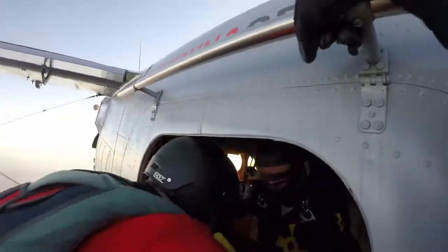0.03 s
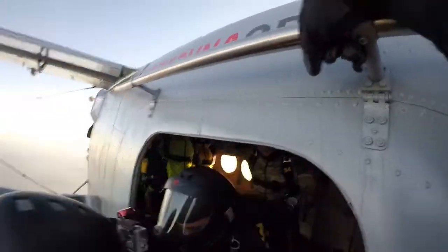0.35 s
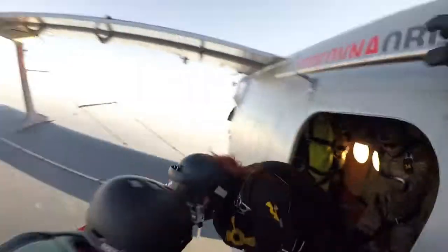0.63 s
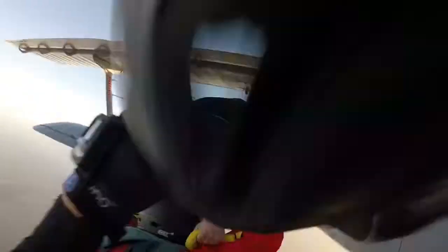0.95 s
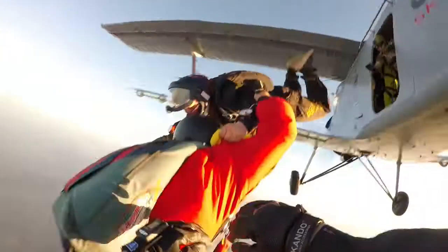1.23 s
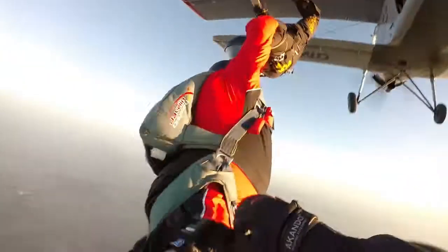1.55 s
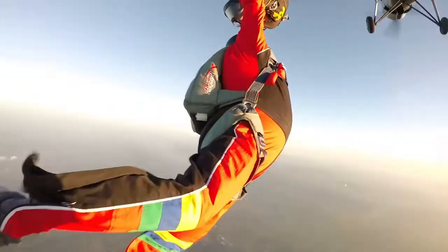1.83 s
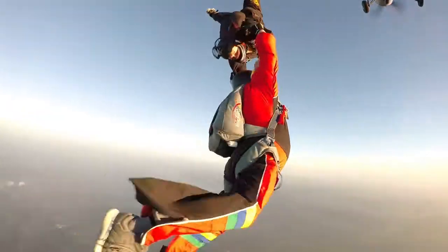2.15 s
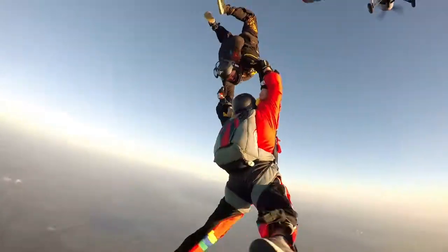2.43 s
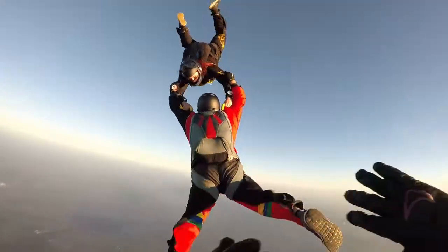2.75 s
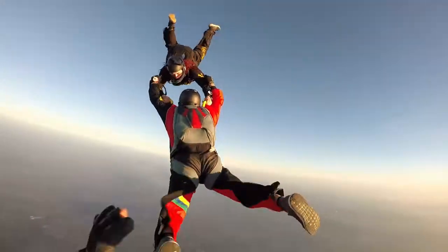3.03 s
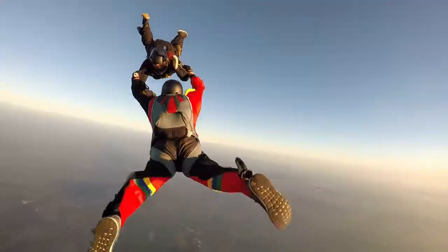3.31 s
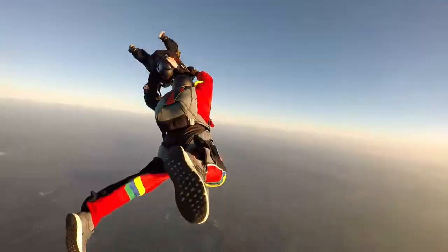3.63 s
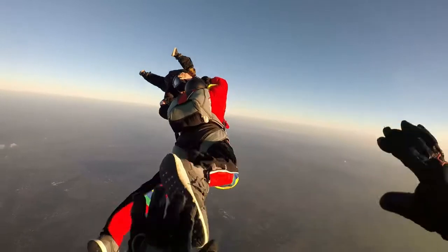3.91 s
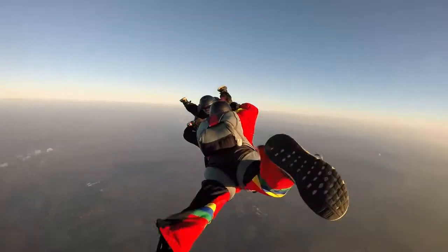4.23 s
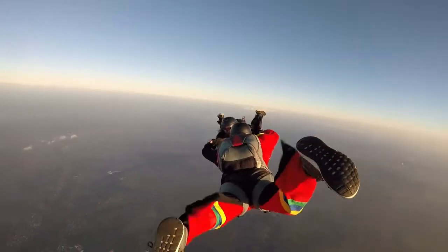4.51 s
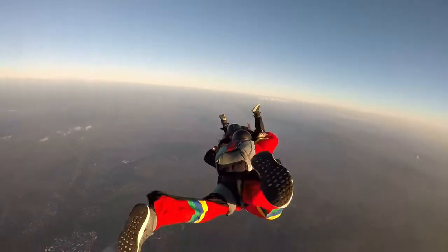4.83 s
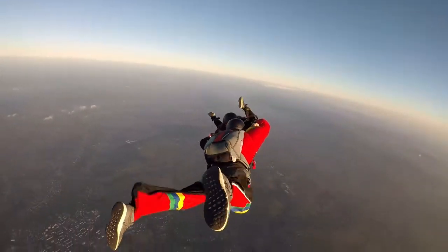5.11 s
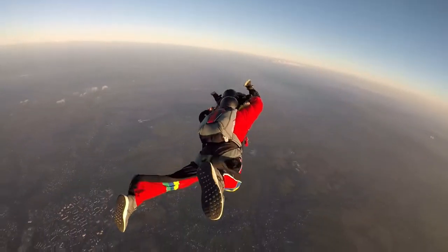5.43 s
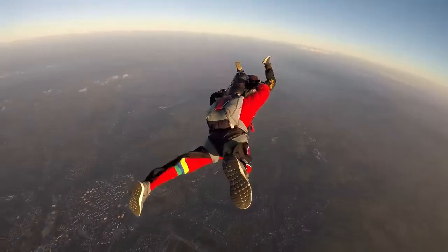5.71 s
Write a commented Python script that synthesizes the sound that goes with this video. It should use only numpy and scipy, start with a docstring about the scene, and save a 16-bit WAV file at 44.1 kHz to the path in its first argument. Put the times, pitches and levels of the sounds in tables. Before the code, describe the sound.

Strong wind buffets the microphone as a skydiver leaves an aircraft, a gusty hiss giving way to a growing free-fall roar.

```python
"""Skydiver's exit and free fall

A helmet camera hears the bright slipstream at an aircraft's door break into gusts as the skydiver
lets go; then the turbulent roar of free fall builds with speed. All along, eddies pound the
microphone port and drive a hollow at the helmet into throbbing resonance."""
import sys
import numpy as np
from scipy import signal
from scipy.fft import rfft, irfft
from scipy.io import wavfile
from scipy.ndimage import uniform_filter1d

SR = 44100
rng = np.random.default_rng(int(sys.argv[2]) if len(sys.argv) > 2 else 0)


def generate_wav(sig):
    """Save sig (samples, or channels by samples) to the path in sys.argv[1] as 16-bit PCM at SR."""
    pcm = np.round(np.clip(np.atleast_2d(sig).T, -1, 1) * 32767).astype(np.int16)
    wavfile.write(sys.argv[1], SR, pcm)


N = 254456
TIME = np.arange(N) / SR
HZ = np.maximum(np.fft.rfftfreq(N, 1 / SR), 1)

# Big eddies bursting on the port: (time [s], level [dB], length [s])
EDDY_BURSTS = [(1.49, -32.5, 0.021), (1.845, -30.5, 0.021), (1.88, -33, 0.059), (1.98, -32.5, 0.032),
               (2.46, -31.5, 0.076), (2.53, -39, 0.044), (3.32, -26.5, 0.044), (5.0, -34, 0.057),
               (5.3, -47, 0.039), (5.46, -32.5, 0.1)]
# Stretches of fluttering, moaning air, and one short low thump of a bursting eddy:
# (time [s], flutter level [dB], moan level [dB], length [s])
FLUTTER_AND_MOAN = [(.35, -40.5, -52, 1), (1.57, -36.5, -61, 0.41), (1.872, -29, -54, 0.062),
                    (2.285, -46, -41.5, 0.43), (3.95, -39, -49, 0.64), (4.9, -39.5, -41, 0.73),
                    (5.45, -31, -34, 0.33)]


def buffet():
    """Turbulent pressure: large eddies shove the diaphragm, easing as the body turns upright."""
    # Eddy strength: (time [s], relative level [dB])
    strength = [(0, -21), (.22, -21), (.8, -21), (1.22, -19), (1.56, -23.5), (1.95, -21), (2.28, -25.5),
                (2.46, -21), (2.74, -30.5), (2.92, -21), (3.34, -20.5), (3.45, -23.5), (3.7, -19),
                (3.9, -23.5), (4.06, -21), (5.0, -21.5), (5.77, -22.5)]
    # Eddy pressure: (frequency [Hz], relative density [dB])
    spectrum = [(5, -11), (12, -1.5), (22, 2), (34, -1), (50, -2), (70, -9), (100, -14.5), (150, -28),
                (300, -46.5), (600, -102)]
    return from_db(in_time(strength) + 1.53) * evened(noise(colour(spectrum)), span_s=0.026, share=0.59)


def throb():
    """Cavity resonance: eddies set a hollow at the helmet ringing."""
    # Driving eddies: (time [s], relative level [dB], length [s])
    drives = [(.32, -27.5, 0.31), (.92, -27, 0.16), (1.68, -28, 0.18), (1.87, -22.5, 0.051),
              (2.41, -22.5, 0.063), (2.54, -17, 0.074), (3.34, -22, 0.087), (3.74, -23.5, 0.051),
              (4.2, -23.5, 0.085), (4.5, -22.5, 0.068), (4.71, -22.5, 0.044), (5.0, -25.5, 0.17),
              (5.47, -20.5, .22)]
    gain = from_db(-2) * np.hypot(from_db(-31.5), swells(drives))
    return gain * evened(noise(resonance(hz=116.6, width_hz=19.5)), span_s=0.051, share=0.9)


def flutter():
    """Smaller eddies pass sooner, so their pressure flutters faster; one bursting eddy thumps."""
    # Small-eddy pressure: (frequency [Hz], relative density [dB])
    spectrum = [(80, 5), (150, -11.5), (185, -3), (225, 1), (260, -6.5), (340, -7.5), (450, -15),
                (800, -34), (2000, -55), (5000, -70)]
    rises = swells([(s, db, length) for s, db, _, length in FLUTTER_AND_MOAN])
    gain = np.hypot(from_db(flow_db(-40.5, follows=0.12)), rises)
    eddies = evened(noise(colour(spectrum)), span_s=0.07, share=0.6)
    return gain * from_db(2.4 * drift(50)) * eddies


def roar(churn):
    """Turbulence, filtered by the camera housing, grows with airspeed and with each bursting eddy."""
    # Roar through the housing: (frequency [Hz], relative density [dB])
    spectrum = [(200, -11), (450, -9), (520, -5), (630, -2.5), (750, -3.5), (830, -9), (940, 1),
                (1060, -2.5), (1210, .5), (1370, -4), (1470, -1.5), (1700, -1.5), (2200, -5), (2430, -3.5),
                (2800, -19), (3600, -29)]
    gain = np.hypot(from_db(flow_db(-32, follows=1)), 0.28 * swells(EDDY_BURSTS))
    return gain * from_db(0.93 + churn + 0.33 * drift(100)) * noise(colour(spectrum))


def slipstream(churn, pressure):
    """Flow noise along the fuselage tears at the port, harshest in each trough of pressure."""
    # Tearing air: (frequency [Hz], relative density [dB])
    spectrum = [(400, -8), (800, -10.5), (1200, -2), (2000, -1), (2700, -3), (3050, -13), (3450, -10),
                (3850, -11.5), (4200, -9), (4700, -12), (5400, -10), (6200, -18), (8000, -21.5),
                (10100, -20.5), (10900, -25.5), (12200, -29), (12900, -37), (15300, -44)]
    leaned_s, let_go_s, release_s, wake_end_s = 0.38, 0.706, 0.045, 1.97
    lean_db_per_s, fade_db_per_s = 13, 27
    door_db = -37.86 + lean_db_per_s * np.minimum(TIME, leaned_s)
    wake_db = -49.86 - fade_db_per_s * np.maximum(TIME - wake_end_s, 0)
    flapping_db = 2.4 * drift(70)
    gone = np.clip((TIME - let_go_s) / release_s, 0, 1)
    level_db = (1 - gone) * door_db + gone * (wake_db + flapping_db)
    tearing_db = 0.88 * churn + 1.66 * drift(140) - 0.77 * pressure
    return from_db(level_db + tearing_db) * crackle(colour(spectrum), per_s=16000)


def gusts():
    """Shreds of the aircraft's turbulent wake hit the port as short broadband rasps."""
    # Wake gusts: (time [s], relative level [dB], length [s])
    hits = [(.65, -44.5, 0.078), (.74, -41, 0.011), (.772, -45, 0.012), (.831, -47, .009),
            (.866, -41, 0.013), (.917, -41, 0.0066), (.938, -46.5, 0.013), (1.013, -49, 0.008),
            (1.055, -43.5, 0.008), (1.11, -45, 0.016), (1.15, -52, 0.13), (1.174, -44, 0.012),
            (1.219, -46, 0.015), (1.273, -47, 0.019), (1.297, -48, 0.0055), (1.34, -51, 0.0042),
            (1.388, -47.5, 0.0049), (1.408, -44.5, 0.0064), (1.486, -40.5, 0.0035), (1.496, -44, 0.0064),
            (1.509, -43.5, 0.0096), (1.554, -48.5, .008), (1.613, -49, 0.0097), (1.657, -44.5, 0.017),
            (1.783, -45.5, 0.011), (1.838, -39.5, 0.018), (1.858, -41, 0.023), (1.885, -43.5, 0.024)]
    # Rasp: (frequency [Hz], relative density [dB])
    spectrum = [(200, 5.5), (700, -1), (1200, 4.5), (2300, 2), (3000, -9), (4100, -8.5), (4700, -14.5),
                (5450, -9), (6200, -15), (7700, -19.5), (9300, -21.5), (10150, -17), (10800, -29),
                (12000, -28), (15300, -46)]
    rasp = evened(crackle(colour(spectrum), per_s=9000), span_s=0.0059, share=0.41)
    return from_db(10) * swells(hits, rise_share=0.4) * rasp


def bursts():
    """Big eddies break on the port; their large scale makes the rumble dull."""
    # Bursting eddy: (frequency [Hz], relative density [dB])
    spectrum = [(130, -2.5), (210, 10.5), (300, 3.5), (450, -8), (650, -3.5), (820, -29), (1000, -6.5),
                (1500, -11), (2400, -28), (3500, -50)]
    return swells(EDDY_BURSTS) * evened(noise(colour(spectrum)), span_s=0.033, share=0.12)


def surges():
    """Resonance lifts one band of the roar as the head turns."""
    # Head turns: (time [s], level [dB], length [s])
    turns = [(2.45, -41, 0.22), (3.5, -37.5, 0.11), (4.22, -35, 0.15), (4.62, -30.5, 0.11),
             (5.0, -33, 0.068), (5.3, -28, 0.039)]
    return swells(turns) * noise(resonance(hz=1150, width_hz=160))


def moan():
    """Forced resonance: turbulence makes the housing moan, swelling at times."""
    rises = swells([(s, db, length) for s, _, db, length in FLUTTER_AND_MOAN])
    gain = np.hypot(from_db(flow_db(-46, follows=0.78)), rises)
    return gain * evened(noise(resonance(hz=589, width_hz=185)), span_s=0.1, share=0.41)


def hiss(churn):
    """Fine turbulence hisses, modulated by the same churning as the roar."""
    # Hiss: (frequency [Hz], relative density [dB])
    spectrum = [(2000, -0.5), (2830, -2), (3000, 0), (3600, -2.5), (4150, -3), (4800, -9), (6100, -8.5),
                (7000, -11.5), (7450, -19.5), (9700, -20), (11300, -25), (12800, -36), (13700, -32),
                (15300, -42)]
    level_db = np.minimum(flow_db(-41.17, follows=1.1), -39.67)
    return from_db(level_db + 0.36 * churn + 0.5 * drift(80)) * noise(colour(spectrum))


def whistle():
    """Breathy edge tones; the upper ones speak while the helmet is turned into the flow."""
    # Edge tones: (frequency [Hz], half-width [Hz], relative level in the flow [dB], out of it [dB])
    modes = [(3392, 46, 3, 6.5), (6140, 95, -2.5, -20), (8425, 50, -16.5, -25)]
    start_s, end_s = 2.43, 2.86
    in_flow = uniform_filter1d(((TIME > start_s) & (TIME < end_s)) * 1., size=4000)
    tones = sum(from_db(off_db + (on_db - off_db) * in_flow) * noise(resonance(hz, width))
                for hz, width, on_db, off_db in modes)
    return from_db(flow_db(-61, follows=0.55) + 5 * in_flow) * tones


def pop(relax_s=0.0026):
    """A sudden step of pressure leaks away by exponential relaxation."""
    # Lone pop: (time [s], pressure step [full scale])
    steps = [(5.084, -0.25)]
    return sum(step * (TIME >= s) * np.exp(-abs(TIME - s) / relax_s) for s, step in steps)


def flow_db(settled_db, follows):
    """Flow noise rises with airspeed: its level in settled fall plus a share of the flow's swing."""
    # Airspeed over the helmet, as loudness: (time [s], relative level [dB])
    flow = [(0, -41), (.66, -43), (.8, -45.5), (1.35, -44.5), (2.15, -41.5), (2.5, -36.5), (2.68, -37),
            (2.95, -36.5), (3.15, -34), (3.55, -32), (4.4, -32), (4.95, -29.5), (5.2, -32.5), (5.3, -29),
            (5.55, -30.5), (5.77, -33)]
    settled_flow_db = -32
    return settled_db + follows * (in_time(flow) - settled_flow_db)


def swells(rows, rise_share=0.58):
    """Gaussian envelopes from (time [s], level [dB], half-power length [s]); the strongest prevails."""
    power = np.zeros(N)
    for s, db, length in rows:
        since = TIME - s + (0.5 - rise_share) * length / 2
        span = length * np.where(since < 0, rise_share, 1 - rise_share)
        bell = np.exp2(-np.minimum((since / span) ** 2, 60))
        power = np.maximum(power, from_db(db) ** 2 * bell)
    return np.sqrt(power)


def noise(gain):
    """Gaussian noise of unit power, filtered by a gain at each frequency."""
    return rms_one(irfft(rfft(rng.standard_normal(N)) * gain, N))


def crackle(gain, per_s):
    """Shot noise of unit power: tiny random snaps, filtered by a gain at each frequency."""
    snaps = rng.standard_normal(N) * (rng.random(N) < per_s / SR)
    return rms_one(irfft(rfft(snaps) * gain, N))


def drift(rate_hz):
    """Low-pass random fluctuation of unit spread."""
    return noise(1 / (1 + (HZ / rate_hz) ** 2))


def colour(points):
    """Spectral envelope through the points, rolling off beyond its ends."""
    hz, db = np.transpose(points)
    skirts = np.minimum(HZ / hz[0], 1) ** 2 * np.minimum(hz[-1] / HZ, 1) ** 4
    return from_db(np.interp(np.log(HZ), np.log(hz), db)) * skirts


def resonance(hz, width_hz):
    """Steep resonance curve whose gain halves about width_hz either side of the peak."""
    return 1 / (1 + ((HZ ** 2 - hz ** 2) / (HZ * width_hz * 2)) ** 2)


def evened(x, span_s, share):
    """Envelope compression brings successive swings closer to one size."""
    size = int(span_s * SR)
    power = uniform_filter1d(uniform_filter1d(x ** 2, size), size)
    return rms_one(x / (power + 1e-9) ** (share / 2))


def in_time(rows):
    """Linear interpolation of (time [s], level [dB]) at every sample."""
    return np.interp(TIME, *np.transpose(rows))


def from_db(db):
    """Decibels to amplitude ratio."""
    return 10 ** (np.asarray(db) / 20)


def rms_one(x):
    """Normalisation to unit power."""
    return x / np.sqrt(np.mean(x ** 2) + 1e-20)


def scene():
    """Superposition: all the air noise adds at one microphone."""
    rumble = buffet() + throb() + flutter()
    churn = drift(65)
    free_fall = roar(churn) + moan() + hiss(churn) + surges()
    rush = free_fall + slipstream(churn, rms_one(rumble))
    shelter = from_db(-5.5 * swells([(1.032, 0, 0.017)]))   # a passing hand briefly shields the port
    return (rumble + shelter * rush + gusts() + bursts() + whistle() + pop())[None]


def record(dry):
    """Soft saturation rounds the largest swings; a low-pass filter cuts the top."""
    ceiling, cutoff_hz = 0.41, 15400
    rounded = dry / (1 + (dry / ceiling) ** 6) ** (1 / 6)
    return signal.sosfilt(signal.ellip(10, .1, 80, cutoff_hz, fs=SR, output="sos"), rounded)


dry = scene()
out = record(dry)
generate_wav(out)
```